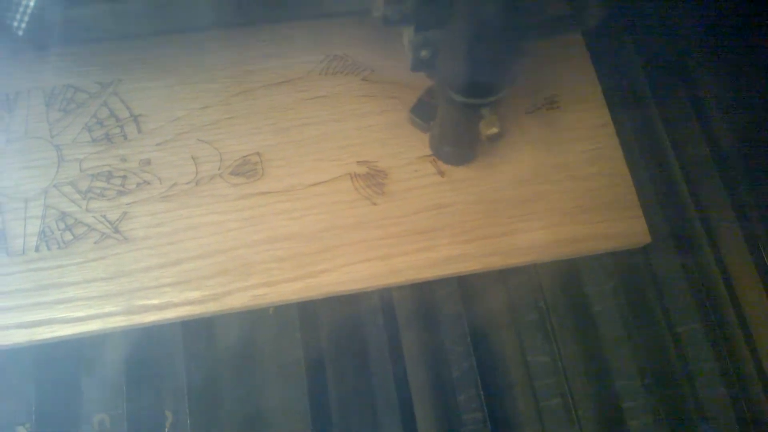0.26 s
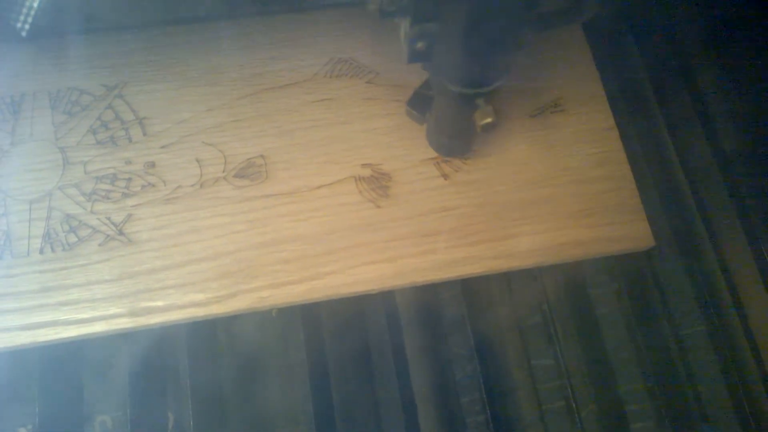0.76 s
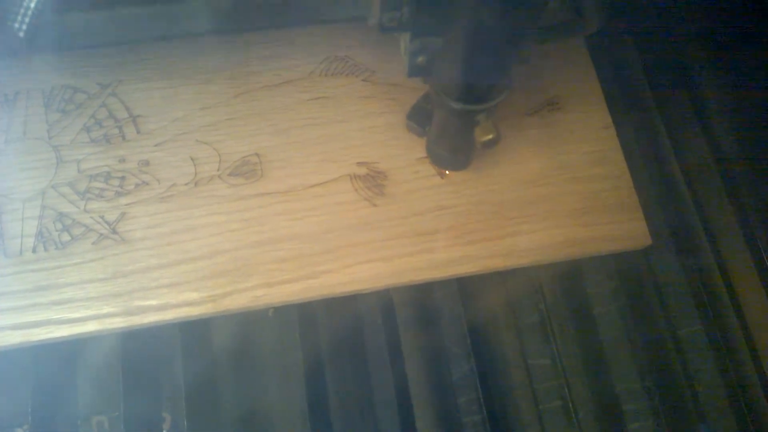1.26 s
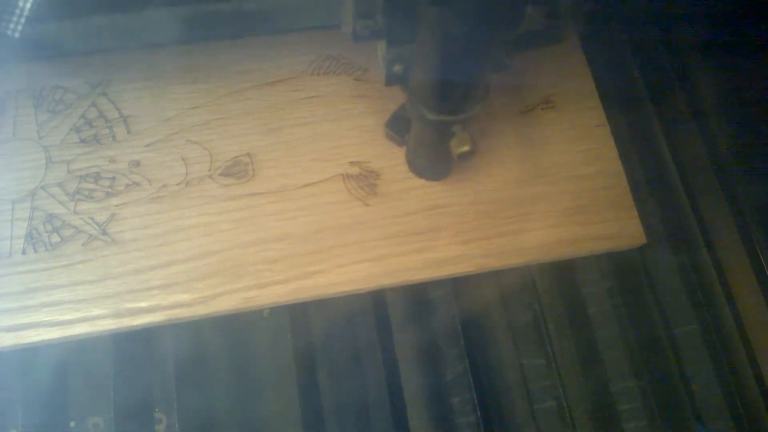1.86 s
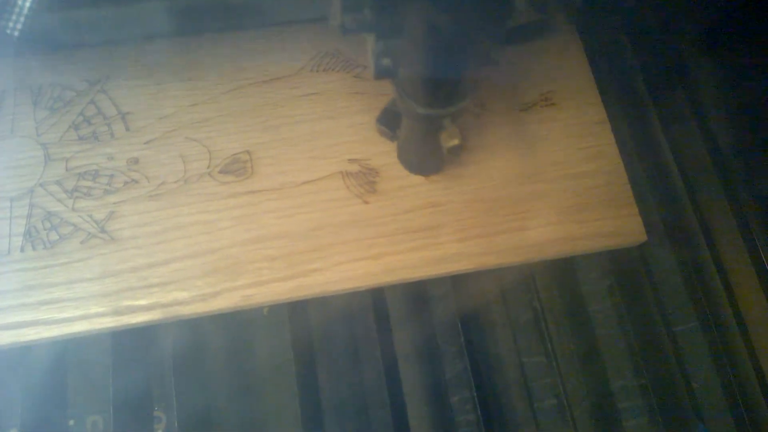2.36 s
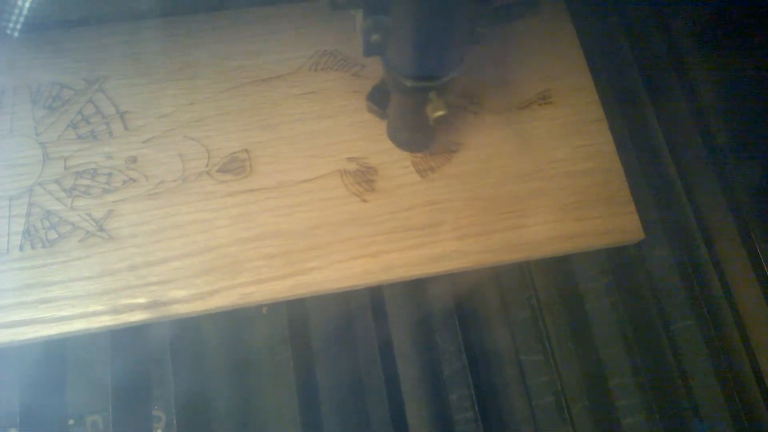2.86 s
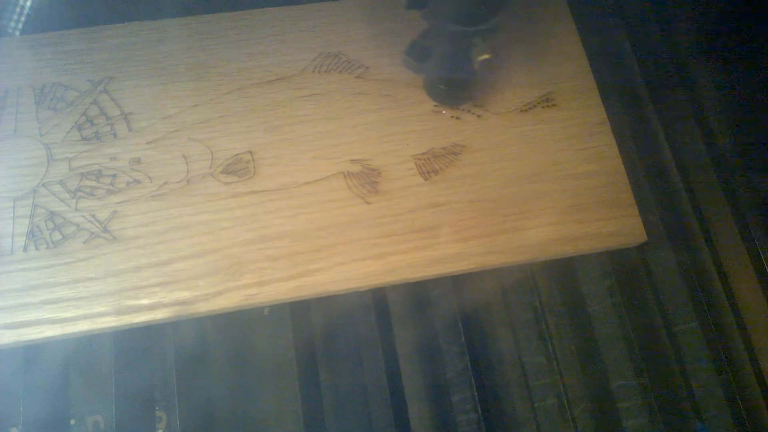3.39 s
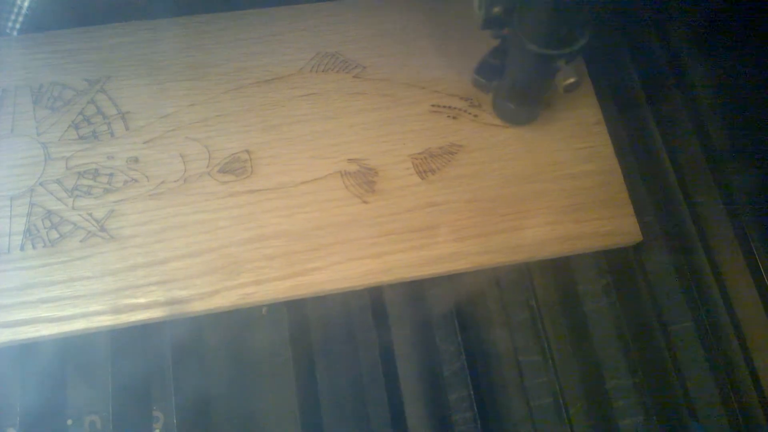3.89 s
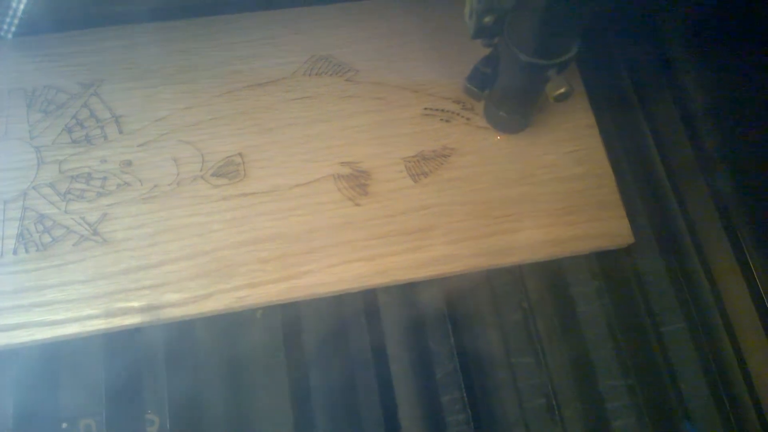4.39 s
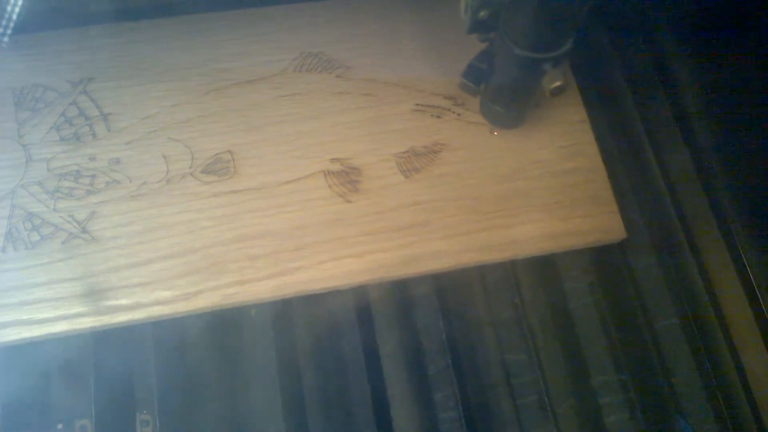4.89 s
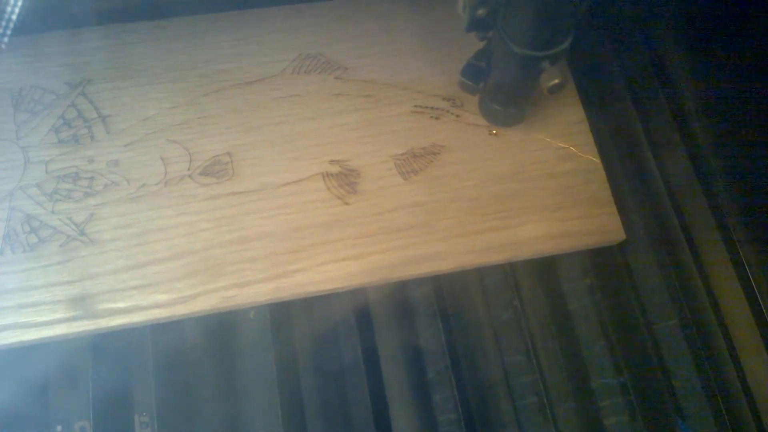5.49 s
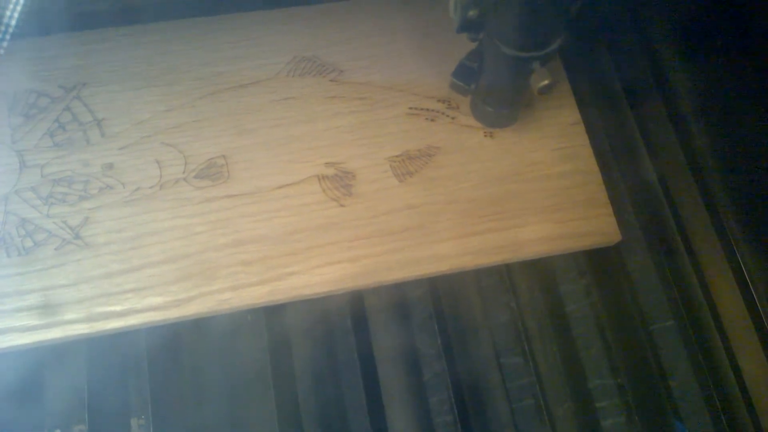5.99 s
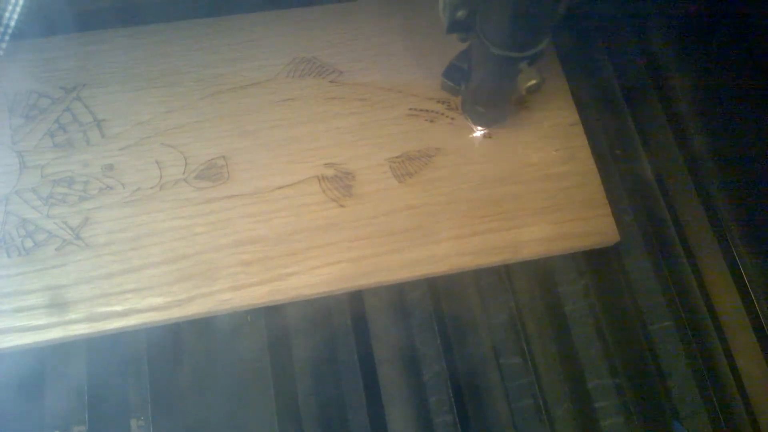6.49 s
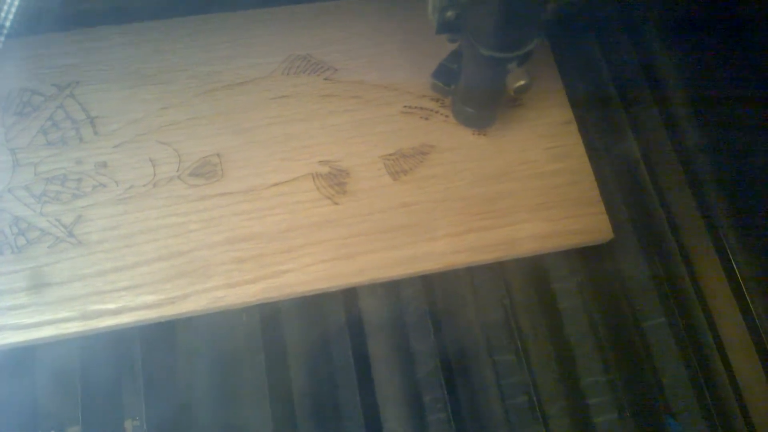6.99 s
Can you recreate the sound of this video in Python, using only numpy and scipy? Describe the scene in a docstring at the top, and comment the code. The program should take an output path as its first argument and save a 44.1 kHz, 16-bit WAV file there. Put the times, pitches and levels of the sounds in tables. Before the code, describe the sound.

Close inside a laser engraving machine, an air pump drones with a deep, buzzy hum and an exhaust fan rumbles in its duct. A thin air jet hisses constantly, swelling into short sizzles several times during the first half, with a tiny breathy whistle near three seconds and faint motor tones. Afterwards the hum, rumble and plain hiss continue. Wide stereo, heard just above the bed.

```python
"""Laser cutter engraving wood

A mains-driven air pump hums and buzzes as harmonics of its stroke; the exhaust fan is noise rumbling in a duct.
The air nozzle is a steady hiss of turbulence that swells and sizzles each time it crosses burnt grooves,
and whistles once on an edge as narrow bands of noise. Stepper motors sing faint gliding tones in short moves.
Metal panels and the duct add their resonances, and the stereo picture widens towards the treble."""
import sys
import numpy as np
from scipy import signal
from scipy.fft import rfft, irfft, next_fast_len
from scipy.io import wavfile
from scipy.ndimage import map_coordinates

SR = 44100
rng = np.random.default_rng(int(sys.argv[2]) if len(sys.argv) > 2 else 0)


def store_pcm(level_fs):
    """Save levels as 16-bit WAV."""
    pcm = np.round(np.clip(level_fs, -1, 1) * 32767).astype(np.int16)
    wavfile.write(sys.argv[1], SR, np.atleast_2d(pcm).T)


N = 319725

MAINS_HZ = 60.02  # the pump makes one stroke per mains cycle
TOP_HZ = 15740  # upper edge of the whole sound

# pump hum harmonics: [multiple of the mains, level/dB rms]
HUM_HARMONICS = [(1, -32.5), (2, -46), (3, -33), (4, -45), (5, -38.5), (6, -42.5), (7, -62), (9, -56.5),
                 (10, -67), (11, -73), (12, -57), (13, -60), (14, -68), (15, -62), (16, -60.5), (17, -66.6),
                 (18, -72), (22, -75), (23, -72), (24, -65.5), (26, -70)]
# colour of the pump buzz before the panels ring: [f/Hz, level/dB rms of one harmonic]
BUZZ_COLOUR = [(1650, -79.5), (2150, -86.5), (2600, -77), (3050, -80), (3500, -74), (3850, -81.5),
               (4550, -80), (5500, -79.5), (6400, -81.5), (6900, -84), (7300, -88.5), (8000, -82.5),
               (8600, -88.5), (9200, -104)]
# panel resonances under the buzz: [f/Hz, width/Hz, boost/dB]
PANEL_MODES = [(3100, 47, 5), (3540, 110, 4), (4650, 70, 7.5), (6930, 70, 9), (7880, 170, 6.5),
               (8080, 70, 1), (8583, 70, 7)]
# exhaust fan noise before the duct: [f/Hz, level/dB per Hz]
FAN_SPECTRUM = [(10, -73), (29, -68), (42, -66), (80, -62), (160, -60), (205, -63), (260, -65.5),
                (340, -70.5), (500, -75), (700, -76), (820, -81.5), (1200, -86), (2000, -104)]
# resonances of cabinet and duct: [f/Hz, width/Hz, boost/dB]
DUCT_MODES = [(49.6, 5.7, 6.5), (95, 4.5, 5.5), (128.4, 20.5, 5.5), (160.5, 27.5, 5), (236.2, 9.3, 9.5),
              (627, 36, 5.5), (673, 17, 2), (734, 44, 5.5), (858, 30, 6)]
# swells of the duct rumble: [middle t/s, half-width t/s, height level/dB]
RUMBLE_SWELLS = [(.35, .25, 2), (4.748, 1, 4.5), (7.05, 0.28, 3.5)]
# free air stream of the nozzle, before its trim: [f/Hz, level/dB per Hz]
FREE_AIR_SPECTRUM = [(1000, -106), (1700, -92.5), (2150, -99.5), (2800, -94), (3400, -93), (4200, -98),
                     (5200, -95), (6200, -97), (7300, -101.5), (8300, -101.5), (9300, -107),
                     (10500, -107.2), (12800, -111.5), (14900, -106.9)]
# air breaking on the grooves, before its trim: [f/Hz, level/dB per Hz]
BROKEN_AIR_SPECTRUM = [(1500, -110), (2300, -94.5), (3200, -90), (4200, -97.5), (5500, -95), (6300, -93.5),
                       (7200, -99), (8200, -96), (9300, -103.2), (10500, -101.5), (12500, -104),
                       (14500, -101), (15600, -102.5)]
# crossings of burnt grooves: [start t/s before the lead, length t/s, level/dB used relative to their mean]
GROOVE_CROSSINGS = [(0.108, 0.23, -68.5), (0.457, 0.192, -69.5), (0.8, 0.188, -68.5), (1.251, 0.16, -70),
                    (1.632, 0.188, -69), (1.958, 0.17, -68.5), (2.217, 0.24, -69), (2.752, 0.068, -72),
                    (3.007, 0.058, -69), (3.269, 0.53, -66.5)]
# stepper moves: [start t/s, length t/s, starting f/Hz, glide over the move f/Hz, mid-move level/dB rms]
STEPPER_MOVES = [(1.15, .2, 1000, 40, -58), (2.3, 1.4, 1041, -1, -60.5), (2.95, 0.2, 1372, 1, -62.5),
                 (3.54, 0.099, 1230, -250, -56), (6.14, .22, 1830, 0, -66)]
# partials of the edge tone: [start t/s, rise t/s, 60 dB decay t/s, f/Hz, width/Hz, level/dB rms]
EDGE_PARTIALS = [(2.982, .01, .25, 6200, 380, -57), (3.001, .01, 0.22, 5950, 320, -48.5),
                 (3.005, .026, .21, 11830, 340, -67)]
# stereo width: [f/Hz, side minus mid level/dB]
STEREO_WIDTH = [(40, -47), (110, -13), (200, -31), (350, -10.5), (650, -6.5), (900, -1.5), (1200, 6),
                (2000, -2.5), (3500, 4), (5200, -1.5), (7500, 0), (15000, 0.5)]
# stereo balance: [f/Hz, left minus right level/dB]
STEREO_BALANCE = [(100, -0.04), (180, 1.4), (350, 2.5), (600, 1.5), (1100, -0.5), (2400, 2.5), (4400, -0.5),
                  (8100, -2.7), (13000, 1)]

# every crossing: edge ramp in s, drop from middle to ends in dB, ring time of the cabinet in s
EDGE_S, SAG_DB, LINGER_S = 0.049, 5, 0.015


def amp(db):
    """Decibels to gain."""
    return 10 ** (np.asarray(db) / 20)


def unit(x):
    """Scaled to rms 1."""
    return x / np.sqrt(np.mean(x ** 2) + 1e-20)


def clock():
    """The time of every sample in seconds."""
    return np.arange(N) / SR


def along(points, hz):
    """A curve of (Hz, value) points read on a log frequency axis."""
    f, value = np.transpose(points)
    return np.interp(np.log(hz + 1e-3), np.log(f), value)


def boost(modes, hz):
    """Gain in dB of (Hz, width, dB) resonances; each boost is halved half a width off centre."""
    return sum(db / (1 + (2 * (hz - centre) / width) ** 2) for centre, width, db in modes)


def wobble(rate):
    """A smooth random curve through normal knots, rate knots a second."""
    knots = rng.standard_normal(int(N * rate / SR) + 4)
    coarse = np.arange(0, N + 64, 64)  # the spline is read every 64 samples
    curve = map_coordinates(knots, [coarse * rate / SR])
    return np.interp(np.arange(N), coarse, curve)


def filtered(x, response):
    """x times a response of frequency, padded so that tails do not wrap round."""
    size = next_fast_len(N + SR // 4)
    hz = np.fft.rfftfreq(size, 1 / SR)
    return irfft(rfft(x, size) * response(hz), size)[..., :N]


def spread(hz):
    """Angle between mid and side: long waves sound more alike left and right."""
    return np.arctan(amp(along(STEREO_WIDTH, hz)))


def rush(spectrum):
    """Stereo turbulence with a spectrum in dB per Hz, falling away above its last point."""
    white = rng.standard_normal((2, N)) * np.sqrt(SR / 2)  # unit power per Hz
    last_hz = spectrum[-1][0]

    def mid_side(hz):
        colour = amp(along(spectrum, hz)) / np.maximum(hz / last_hz, 1) ** 2
        return colour * [np.cos(spread(hz)), np.sin(spread(hz))]

    mid, side = filtered(white, mid_side)
    return np.array([mid + side, mid - side])


def singing_air(centre_hz, width_hz, side):
    """Stereo turbulence of rms 1 in one narrow resonance."""
    ring = lambda hz: 1 / (1 + (2 * (hz - centre_hz) / width_hz) ** 2)
    common, apart = filtered(rng.standard_normal((2, N)), ring)
    return unit(np.array([common + side * apart, common - side * apart]))


def stroke(orders, gains, phase, leading, size=8192):
    """A stereo wave repeating every pump stroke; each harmonic's phase leads left (+) or right (-)."""
    apart = spread(orders * MAINS_HZ) * leading
    lines = np.zeros((2, size // 2 + 1), complex)
    lines[:, orders] = gains * np.exp(1j * (phase + [apart, -apart])) * size / np.sqrt(2)
    place = clock() * MAINS_HZ % 1 * size  # position within the stroke
    grid = np.arange(size + 1)
    return np.array([np.interp(place, grid, np.append(cycle, cycle[0])) for cycle in irfft(lines, size)])


def pump_hum(waver_db=0.3, housing_hz=205, housing_width_hz=40):
    """The diaphragm thumps once a mains cycle; the housing's resonance delays the harmonics near it."""
    orders, db = np.transpose(HUM_HARMONICS)
    orders = np.round(orders).astype(int)
    hz = orders * MAINS_HZ
    delay = 2 * np.arctan2(housing_width_hz * hz, housing_hz ** 2 - hz ** 2)  # phase in rad
    scatter = (orders / 9) ** 3 * rng.standard_normal(len(orders))  # upper phases are loose, rad
    hum = stroke(orders, amp(db), np.pi - delay + scatter, leading=-0.95)
    return hum * amp(waver_db * wobble(5.6))


def pump_buzz(scatter_db=9.5, shifting=0.35, turning_rad=0.84):
    """Air pulses excite many cabinet modes; their pattern shifts as the head travels."""
    orders = np.arange(27, 160)
    hz = orders * MAINS_HZ
    colour = amp(along(BUZZ_COLOUR, hz) + boost(PANEL_MODES, hz))

    def pattern():
        uneven = unit(amp(scatter_db * rng.uniform(-0.73, 1, (2, len(orders)))))
        phase = rng.uniform(0, 2 * np.pi, len(orders))
        leading = rng.choice([-1, 1], len(orders))
        return stroke(orders, colour * uneven, phase, leading)

    turn = turning_rad * wobble(1.94)
    moving = np.cos(turn) * pattern() + np.sin(turn) * pattern()
    return (pattern() + shifting * moving) / np.sqrt(1 + shifting ** 2)  # mixed by power


def exhaust(rest_db=-4.5, surge_db=0.7, rumble_hz=125, rumble_width_hz=100):
    """The fan draws smoke through the resonant duct; its low rumble swells now and then."""
    air = filtered(rush(FAN_SPECTRUM), lambda hz: amp(boost(DUCT_MODES, hz)))
    low = filtered(air, lambda hz: 1 / (1 + (2 * (hz - rumble_hz) / rumble_width_hz) ** 6))
    swell_db = sum(db * np.exp(-((clock() - moment) / width) ** 2) for moment, width, db in RUMBLE_SWELLS)
    rumble = low * amp(rest_db + swell_db)
    return (air - low + rumble) * amp(surge_db * wobble(6))


def nozzle(pulsing=0.027, air_db=-0.87, gain_db_per_s=0.13, groove_db=-1.6, waver_db=0.5, lead_s=0.011):
    """The air jet grows slowly, wavers, throbs a little with the pump and hisses harder over burnt grooves."""
    t = clock()
    free = rush(FREE_AIR_SPECTRUM) * amp(air_db + gain_db_per_s * t + waver_db * wobble(9))
    broken = rush(BROKEN_AIR_SPECTRUM) * grooves(lead_s) * amp(groove_db)
    throb = 1 + pulsing * np.sin(2 * np.pi * MAINS_HZ * t)
    return (free + broken) * throb


def grooves(lead_s, flutter_db=0.8):
    """Groove gain, about 1 midway in an average crossing: each sags to its ends and lingers in the cabinet."""
    t, gain = clock() + lead_s, np.zeros(N)
    usual_db = np.mean([db for start, length, db in GROOVE_CROSSINGS])
    for start, length, db in GROOVE_CROSSINGS:
        age = t - start
        gate = np.clip(np.minimum(age, length - age) / EDGE_S + 0.5, 0, 1)  # half open at start and end
        off_centre = np.clip(2 * age / length - 1, -1, 1)
        gain += gate * amp(db - usual_db - SAG_DB * off_centre ** 2)
    keep = np.exp(-1 / (LINGER_S * SR))
    power = signal.lfilter([1 - keep], [1, -keep], gain ** 2)
    return np.sqrt(power) * amp(flutter_db * wobble(25))


def sizzle(db=-61, lead_s=0.033):
    """The gap under the nozzle resonates as soon as the jet nears a groove."""
    return singing_air(centre_hz=5170, width_hz=870, side=0.67) * amp(db) * grooves(lead_s)


def steppers(jitter=0.012):
    """Each move of the head sings at the motor's step rate, fading in and out."""
    t, out = clock(), np.zeros((2, N))
    for start, length, hz, glide_hz, db in STEPPER_MOVES:
        on = (t > start) & (t < start + length)
        done = (t[on] - start) / length
        pitch = (hz + glide_hz * done) * (1 + jitter * wobble(120)[on])
        apart = spread(hz) * np.array([[1], [-1]])
        tone = np.sqrt(2) * np.sin(2 * np.pi * np.cumsum(pitch) / SR + apart)
        fade = np.abs(np.sin(np.pi * done)) ** 0.5
        out[:, on] += amp(db) * fade * tone
    return out


def whistle():
    """The jet splits on a groove's edge: a breathy edge tone whose octave builds up later."""
    t, out = clock(), np.zeros((2, N))
    for start, rise, t60, hz, width, db in EDGE_PARTIALS:
        age = np.maximum(t - start, 0)
        decay_db = 60 * np.maximum(age - rise, 0) / t60
        level = np.minimum(age / rise, 1) * amp(db - decay_db)
        out += level * singing_air(hz, width, side=0.69)
    return out


def scene():
    """The whole machine, heard just above its bed, with its left-right balance."""
    machine = pump_hum() + pump_buzz() + exhaust() + nozzle() + sizzle() + steppers() + whistle()
    halves = np.array([[0.5], [-0.5]])  # half the difference on each side
    return filtered(machine, lambda hz: amp(along(STEREO_BALANCE, hz) * halves))


def record(dry, fade_s=0.0013):
    """Eases both ends, then removes everything above the band limit."""
    t = clock()
    to_end = np.minimum(t, t[-1] - t)
    ease = np.sin(np.pi / 2 * np.clip(to_end / fade_s, 0, 1)) ** 2
    return filtered(dry * ease, lambda hz: hz < TOP_HZ)


dry = scene()
out = record(dry)
store_pcm(out)
```